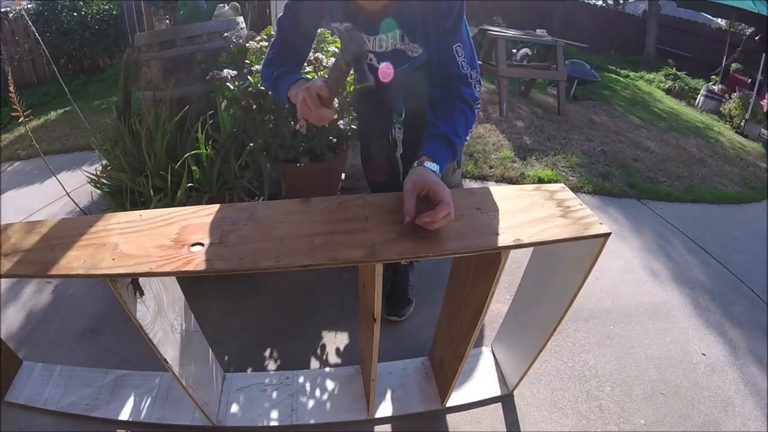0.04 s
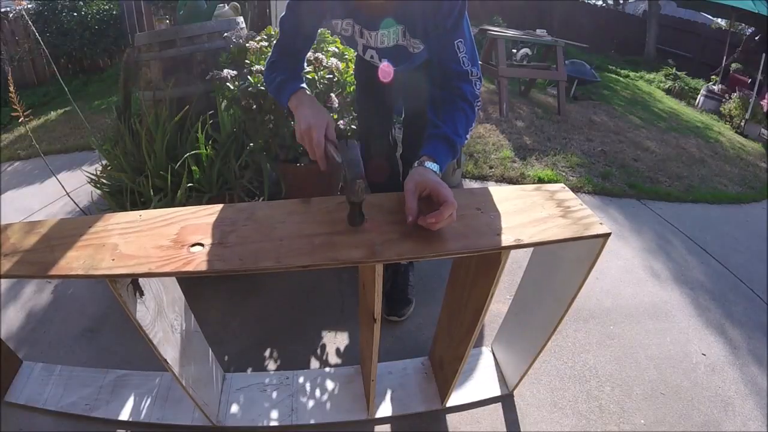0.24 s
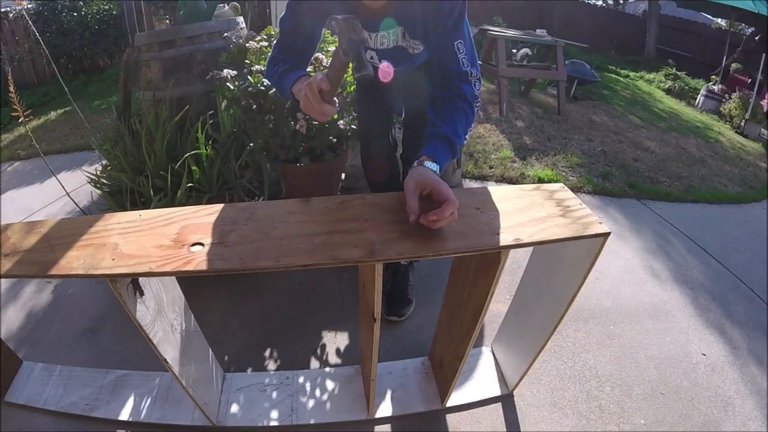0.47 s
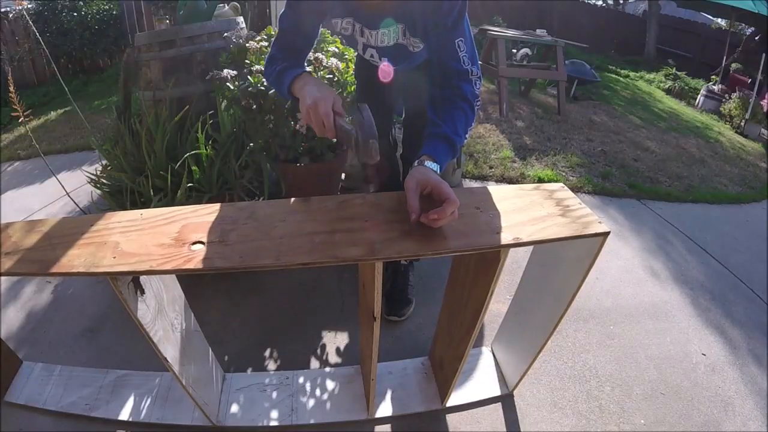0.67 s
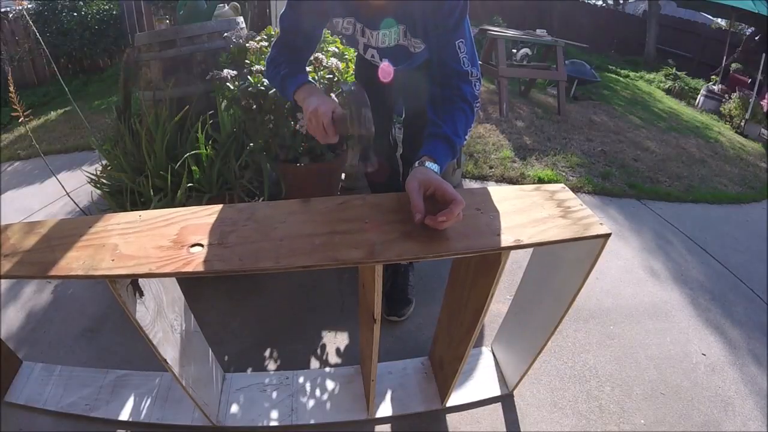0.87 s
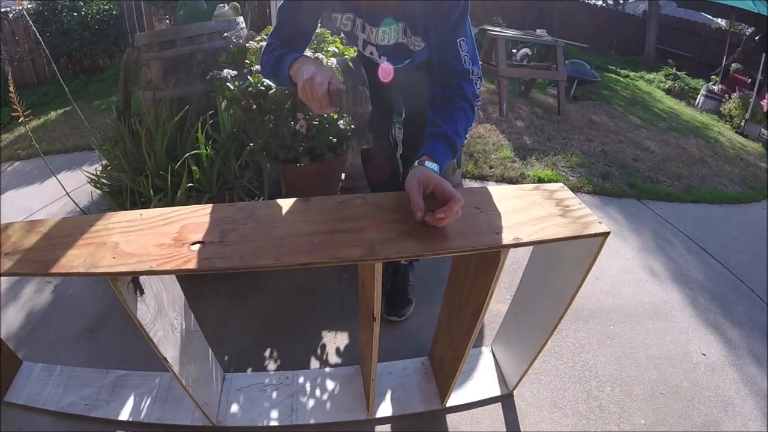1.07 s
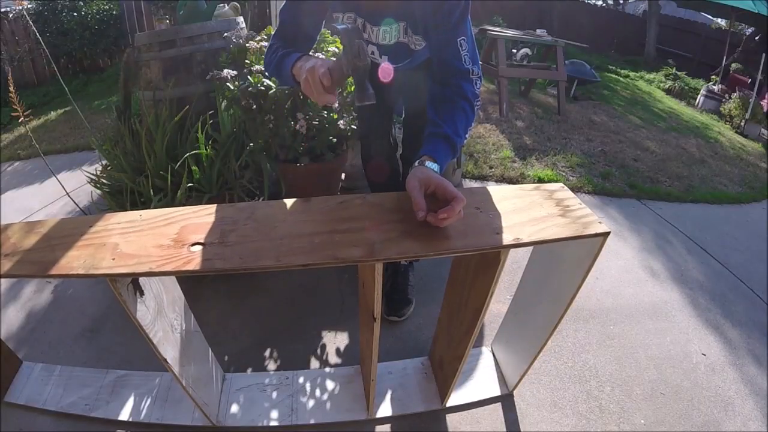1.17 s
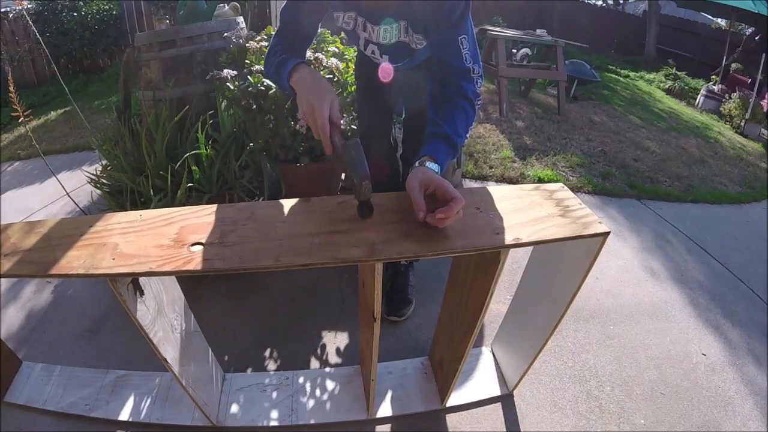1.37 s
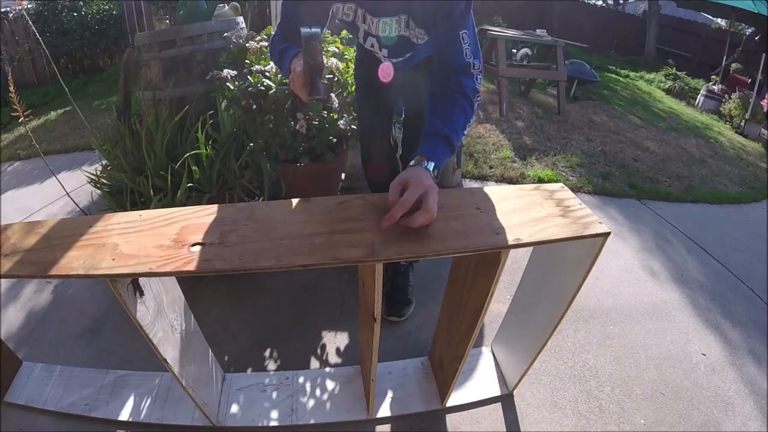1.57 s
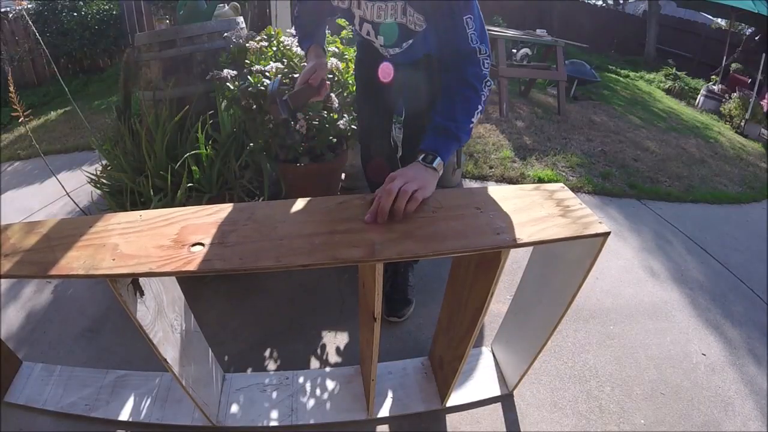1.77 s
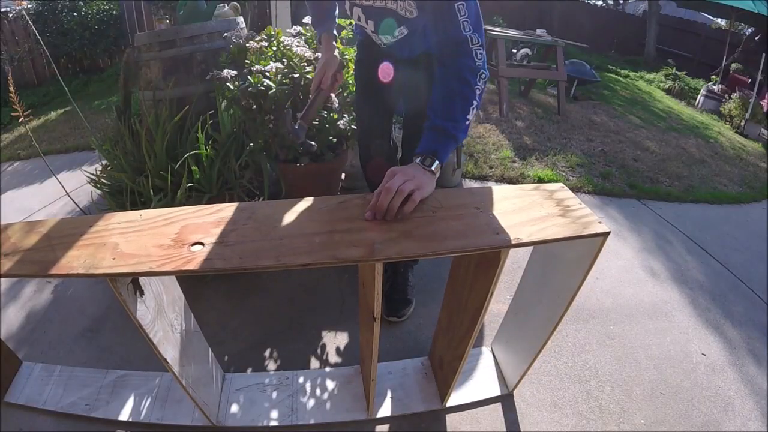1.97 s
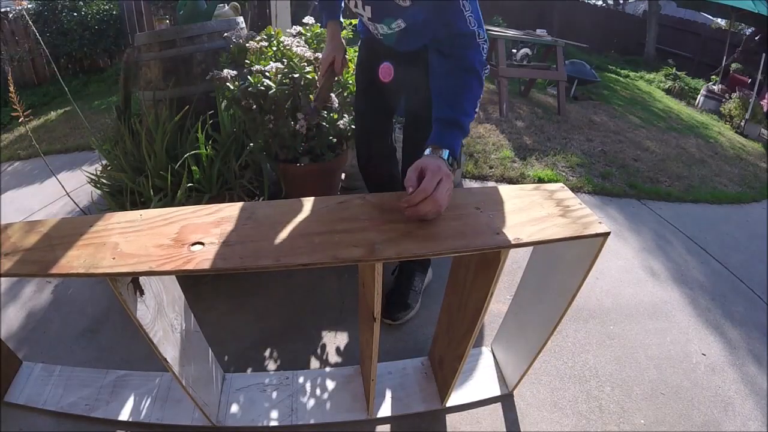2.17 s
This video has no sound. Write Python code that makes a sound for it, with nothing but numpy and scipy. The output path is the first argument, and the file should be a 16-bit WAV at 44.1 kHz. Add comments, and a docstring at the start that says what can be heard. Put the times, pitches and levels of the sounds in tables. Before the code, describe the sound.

A hammer hits a nail in thin plywood over a hollow frame. A faint blow sounds right at the start, then strong ones at about 0.3, 0.7, 1.0 and 1.4 seconds. Each has a hard knock, short steel click, hollow board ring and low boom with quick patio reflections. The last is duller and deeper. Afterwards the ring fades into quiet wind and distant traffic rumble.

```python
"""Five hammer blows about a third of a second apart, the first faint, over quiet traffic and wind.
Each blow pushes a framed board: a decaying knock, paired board modes and a low boom.
Steel adds short high rings and a noise crack. Echoes and a noise tail from board and patio follow.
The background is banded noise: gusty rumble, lightly flickering mids and treble.
"""
import sys
import numpy as np
from scipy import signal
from scipy.io import wavfile
from scipy.ndimage import uniform_filter1d

SR = 44100
rng = np.random.default_rng(int(sys.argv[2]) if len(sys.argv) > 2 else 0)


def waveform_to_disk(signal):
    """Save audio, clipped to [-1, 1], as 16-bit WAV at the path in sys.argv[1]."""
    frames = np.transpose(np.atleast_2d(signal))
    scaled = np.clip(frames, -1, 1) * 32767
    samples = np.round(scaled).astype(np.int16)
    wavfile.write(sys.argv[1], SR, samples)


N = 98519


def undb(db):
    """Amplitude factor of a level in dB."""
    return 10 ** (np.asarray(db) / 20)


def unit(x):
    """Scale to an RMS of 1."""
    return x / np.sqrt(np.mean(x ** 2))


def fade(t, t60):
    """Exponential decay, 60 dB in t60 s."""
    return np.exp(-np.log(1000) * t / t60)


def sine(t, hz):
    """Sine starting at zero phase."""
    return np.sin(2 * np.pi * hz * t)


def band(x, lo_hz, hi_hz):
    """Butterworth band-pass."""
    sos = signal.butter(2, [lo_hz, min(hi_hz, .45 * SR)], "band", fs=SR, output="sos")
    return signal.sosfilt(sos, x)


def walk(rate_hz):
    """Random levels held 1 / rate_hz s and slewed twice."""
    k = int(SR / rate_hz)
    steps = np.repeat(rng.standard_normal(N // k + 1), k)
    slewed = uniform_filter1d(uniform_filter1d(steps, k), k)
    return 1.3 * slewed[:N]  # makes up the spread lost in slewing


def ring(t, hz, db, t60):
    """Decaying sines, one per mode, neighbours in opposite phase."""
    sign = (-1.) ** np.arange(len(hz))
    level = (sign * undb(db))[:, None]
    return (level * fade(t, t60[:, None]) * sine(t, hz[:, None])).sum(axis=0)


def hammering():
    """Every blow at its moment; the thin board radiates no deep bass."""
    # blows: (time [s], level [dB], knock [dB], knock pitch [Hz], crack [dB], top treble [dB],
    # frame boom [dB], boom t60 [s], first strong mode [dB], second strong mode [dB],
    # high board modes [dB], ring length [factor], contact [ms])
    blows = [(-0.012, -23.5, -5, 900, -9, -12, -5.5, 0.79, -2.5, -5.5, -4.5, 0.89, .45),
             (0.3083, -13, 9, 1200, -8, 3, -2.5, 0.52, -1, -9.5, 0, .95, 0.32),
             (0.676, -13.5, 8, 1120, -9, 0.5, 0.5, 0.39, 2, -2, -0.5, 1.055, .4),
             (1.0229, -13, 7.5, 1006, -12, -0.5, -1, 0.41, 2, 6, 3, 1.06, .45),
             (1.4153, -13.5, 11, 569, -16, -10.5, -5.5, 0.23, 3, 7.5, 2, 1.08, 0.53)]
    pad = 2048  # samples of lead-in: the first blow falls just before the start
    low_cut_hz = 115
    out = np.zeros(N + pad + SR)
    for time_s, db, *how in blows:
        i = pad + int(time_s * SR)
        out[i:i + SR] += undb(db) * blow(*how)
    sos = signal.butter(2, low_cut_hz, "high", fs=SR, output="sos")
    return signal.sosfilt(sos, out)[pad:pad + N]


def blow(knock_db, knock_hz, crack_db, top_db, boom_db, boom_t60, first_db, second_db,
         high_db, sustain, contact_ms):
    """One blow: a half-sine push rings board and frame, steel cracks, all blurs into a tail."""
    t = np.arange(SR) / SR
    colour = blow_colour(crack_db, top_db, high_db)
    knock = undb(knock_db) * fade(t, .015) * sine(t, knock_hz)
    wood = board(t, colour, first_db, second_db, sustain) + knock
    boom = undb(boom_db) * frame(t, boom_t60)
    push = np.sin(np.pi * np.clip(t[:200] * 1000 / contact_ms, 0, 1))
    push = push / push.sum()
    wood = signal.fftconvolve(wood, push)[:SR]
    boom = signal.fftconvolve(boom, push)[:SR]
    crack = undb(crack_db) * steel(t, top_db)
    wood_taps, steel_taps = echoes()
    wood = signal.fftconvolve(wood, wood_taps)[:SR]
    crack = signal.fftconvolve(crack, steel_taps)[:SR]
    return wood + crack + boom + tail(t, colour)


def blow_colour(crack_db, top_db, high_db):
    """Level in dB against pitch for one blow: flat lows, then high modes, crack and top treble."""
    corner_hz = [676, 880, 1350, 1700, 6500, 11000]
    level_db = [0, high_db, high_db, crack_db, crack_db, crack_db + top_db]
    return lambda f: np.interp(np.log(f), np.log(corner_hz), level_db)


def board(t, colour, first_db, second_db, sustain):
    """Board modes, each with a close, weaker twin to beat against; they take a moment to fill."""
    # mode pitches [Hz]
    board_hz = [224, 268, 408, 497, 554, 623, 686, 764, 842, 918, 1012, 1055, 1088, 1126, 1167, 1230, 1380,
                1497]
    # the same modes: (level before colour [dB], t60 before ring length factor [s])
    board_modes = [(-19, 0.27), (-15.5, 0.9), (-25.5, 0.44), (-4, 0.19), (-8, 0.22), (-6.5, 0.22),
                   (-14.5, 0.32), (-25, 0.071), (-12, 0.25), (-9, 0.21), (-18, 0.18), (-19.5, 0.33),
                   (-9.5, 0.18), (-14, 0.41), (-13, .16), (-14, 0.084), (-19.5, 0.17), (-22.5, 0.033)]
    scatter_db, detune = 1.5, .003  # standard deviations per blow; detune is a fraction
    pair_hz, pair_db = 14, -11.5  # standard deviation of the twin's offset; its level
    swell_ms = 2.5  # time constant
    hz, (db, t60) = np.array(board_hz), np.array(board_modes).T
    chance = rng.standard_normal((3, len(hz)))
    db = db + colour(hz) + scatter_db * chance[0]
    db[[3, 5]] += first_db, second_db
    t60 = t60 * sustain
    hz = hz * (1 + detune * chance[1])
    modes = ring(t, hz, db, t60)
    twins = ring(t, hz + pair_hz * chance[2], db + pair_db, t60)
    return (modes + twins) * (1 - np.exp(-t * 1000 / swell_ms))


def frame(t, boom_t60):
    """Frame boom and thud, plus a low sine as the frame rocks on the paving."""
    boom_hz, boom_db = 156.5, -1.5
    thud_hz, thud_t60_s, thud_db = 177, .11, -.5
    legs_hz, legs_t60_s, legs_db = 98, .6, -22.5
    boom = undb(boom_db) * fade(t, boom_t60) * sine(t, boom_hz)
    thud = undb(thud_db) * fade(t, thud_t60_s) * sine(t, thud_hz)
    legs = undb(legs_db) * fade(t, legs_t60_s) * sine(t, legs_hz)
    return boom + thud + legs


def steel(t, top_db):
    """Steel on steel: short rings of hammer head and nail, and a noise snap."""
    # ring pitches [Hz]
    steel_hz = [2150, 2660, 3410, 3620, 5190, 6730, 10900]
    # the same rings: (level relative to crack [dB], t60 [s])
    steel_rings = [(-4.5, 0.041), (1, 0.031), (2, 0.016), (2.5, 0.032), (-3.5, 0.011), (-1.5, .015),
                   (-10, 0.0044)]
    noise_db, noise_t60_s = 9.5, .018
    noise = rng.standard_normal(SR) * fade(t, noise_t60_s) * undb(noise_db)
    top = band(band(noise, 9500, 11000), 7000, 15000)
    snap = band(noise, 1300, 5800) + undb(top_db - 13) * top
    return ring(t, np.array(steel_hz), *np.array(steel_rings).T) + snap


def echoes():
    """Direct sound and a few returns from paving and walls, phase-inverted for the wood."""
    # early returns: (delay [ms], level for wood [dB], level for steel [dB])
    returns = [(3.502, 1, -11.5), (7.32, -11, -7), (21.45, -15.5, -15.5), (27.363, -5, -16.5)]
    t = np.arange(SR // 20) / SR
    wood_taps, steel_taps = 1. * (t == 0), 1. * (t == 0)
    for ms, wood_db, steel_db in returns:
        tap = np.clip(1 - np.abs(t - ms / 1000) * SR, 0, 1)  # split between two samples
        wood_taps = wood_taps - undb(wood_db) * tap
        steel_taps = steel_taps + undb(steel_db) * tap
    return wood_taps, steel_taps


def tail(t, colour):
    """Dense tail of board and patio: narrow noise bands build, decay, and swell at a wall return."""
    # tail bands: (pitch [Hz], level before colour and tail gain [dB], t60 [s])
    tail_bands = [(130, -10, 0.41), (213, -10.5, 0.45), (322, -11.5, 0.33), (520, -6, 0.31),
                  (810, 2.5, 0.16), (1200, 2.5, 0.18), (1396, -11.5, 0.12), (2010, -5.5, .24),
                  (2600, -5, .24), (2940, -14, .24), (3370, -3, 0.27), (4500, -16, 0.34), (5130, -2.5, .26),
                  (6540, -5.5, .25), (8000, -15.5, 0.27), (11000, -16.5, 0.18), (14500, -22.5, .17)]
    late_db, late_t60_s = -28, .64  # faint slower decay under each band
    wall_ms, wall_spread_ms, wall_db = 27.5, 5.1, -5  # cluster of returns from the nearest wall
    rise_ms, tail_db = 5, -9.5
    hz, db, t60 = np.array(tail_bands).T
    out = 0
    for f in 110 * 2 ** (np.arange(36) / 5):
        band_db = np.interp(np.log(f), np.log(hz), db) + colour(f)
        band_t60 = np.interp(np.log(f), np.log(hz), t60)
        shape = fade(t, band_t60) + undb(late_db) * fade(t, late_t60_s)
        noise = band(rng.standard_normal(SR), f / 2 ** (1 / 10), f * 2 ** (1 / 10))
        out = out + undb(band_db) * shape * unit(noise)
    wall = undb(wall_db) * np.exp(-((t * 1000 - wall_ms) / wall_spread_ms) ** 2)
    rise = 1 - np.exp(-(t * 1000 / rise_ms) ** 2)
    return undb(tail_db) * out * (1 + wall) * rise


def air():
    """Traffic and wind in near half-octave bands; the rumble gusts, the rest flickers lightly."""
    # spectrum, relative within each group: (pitch [Hz], density [dB per Hz])
    spectrum = [(22, -4), (40, -10.5), (66, -7.5), (85, -17), (110, -17), (181, -22), (355, -30),
                (548, -29.5), (844, -27), (1200, -33), (1450, -50), (3000, -55), (10700, -70), (14000, -84)]
    # group levels: (time [s], rumble [dB], mids [dB], treble [dB])
    group_levels = [(0, -36, -47, -57), (.25, -45.5, -57, -72.5), (0.618, -44.5, -57, -72),
                    (.95, -47, -55.5, -74), (1.301, -52.5, -62, -77), (1.699, -52, -63.5, -80.5),
                    (1.902, -51, -60.5, -77), (2.098, -49.5, -57, -73.5), (2.23, -43.5, -54, -68.5)]
    gust_db, flicker_db, rate_hz = 2.5, 1.2, 9.4
    t, out = np.arange(N) / SR, 0
    hz, db = np.array(spectrum).T
    time_s, *levels_db = np.array(group_levels).T
    groups_hz = [(0, 140), (140, 1500), (1500, SR)]
    depths_db = (gust_db, flicker_db, flicker_db)
    for (lo, hi), level_db, depth_db in zip(groups_hz, levels_db, depths_db):
        part = 0
        for f in 22 * 2 ** np.arange(0, 9.6, .5):
            if lo <= f < hi:
                band_db = np.interp(np.log(f), np.log(hz), db) + depth_db * walk(rate_hz)
                noise = band(rng.standard_normal(N), f / 2 ** .23, f * 2 ** .25)
                part = part + undb(band_db) * noise
        out = out + unit(part) * undb(np.interp(t, time_s, level_db))
    return out


def scene():
    """Hammering over the background air, one channel."""
    return (hammering() + air())[None]


def record(dry):
    """The loudest peaks are rounded and the top is cut."""
    top_hz = 15800
    rounded = np.tanh(0.61 * dry) / 0.59
    return signal.sosfilt(signal.ellip(10, .2, 80, top_hz, fs=SR, output="sos"), rounded)


dry = scene()
out = record(dry)
waveform_to_disk(out)
```